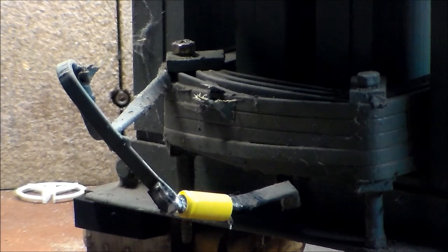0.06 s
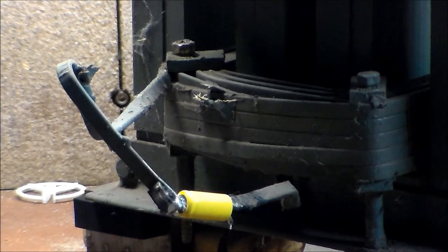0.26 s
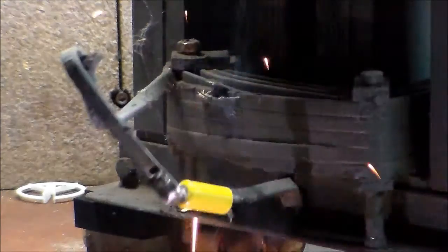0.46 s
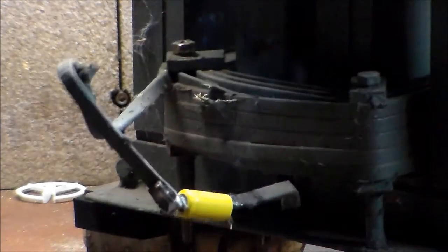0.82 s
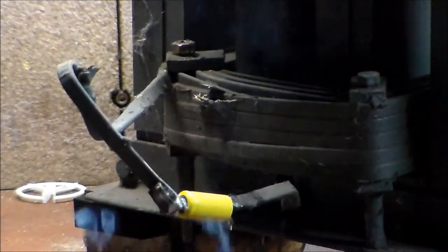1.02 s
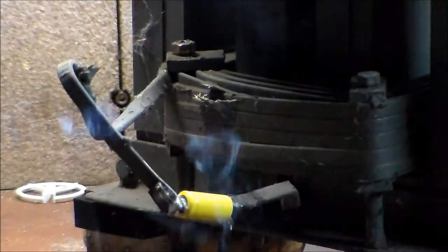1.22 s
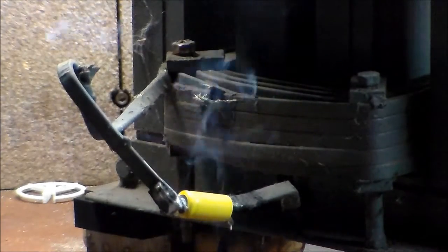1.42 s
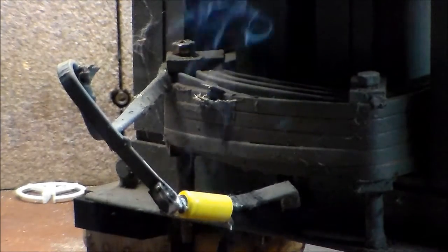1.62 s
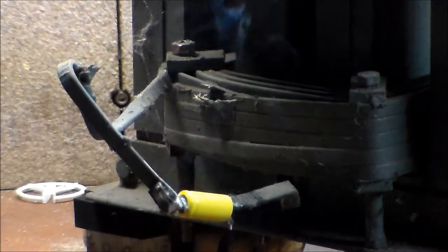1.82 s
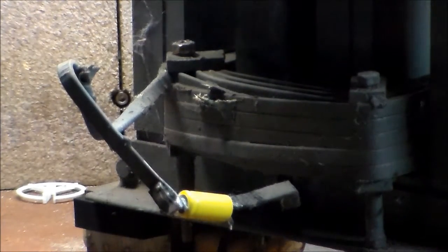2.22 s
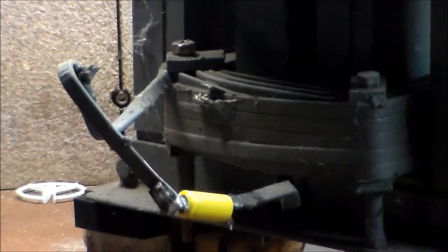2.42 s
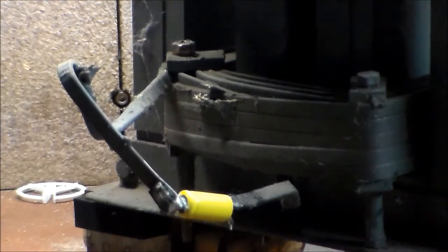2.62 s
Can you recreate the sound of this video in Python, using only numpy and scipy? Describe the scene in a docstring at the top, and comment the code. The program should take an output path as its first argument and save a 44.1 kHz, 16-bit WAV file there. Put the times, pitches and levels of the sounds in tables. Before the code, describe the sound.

A sharp electrical bang echoes briefly in a workshop, followed by a faint metallic clink. Heard from nearby, a transformer hums over machinery rumble and a faint wavering whistle, until a switch trips with a loud crack and thud.

```python
"""A workshop, heard in stereo near a big transformer. An overloaded capacitor ticks, then bursts with a
sharp bang and a spit of sparks; some way off a metal fragment clinks down. The core hums at mains pitch
and a thin whistle wavers, until a switch cracks open and its armature thuds home. Both bangs shake the
steel frame and echo round the room. Machinery rumbles behind it all; after each bang, dips drawn into
the background's level stand for the ducking of the recorder's automatic gain."""
import sys
import numpy as np
from scipy import signal
from scipy.fft import rfft, irfft, next_fast_len
from scipy.io import wavfile

SR = 44100
rng = np.random.default_rng(int(sys.argv[2]) if len(sys.argv) > 2 else 0)


def pcm_store(signal):
    """Save signal as 16-bit PCM."""
    levels = np.round(np.clip(np.atleast_2d(signal), -1, 1) * 32767)
    wavfile.write(sys.argv[1], SR, levels.astype(np.int16).T)


N = 121275
T = np.arange(N) / SR
CUTOFF_HZ = 14300


def from_db(db):
    """Decibels to gain."""
    return 10 ** (np.asarray(db) / 20)


def rms_one(x):
    """Scale to unit rms."""
    return x / np.sqrt(np.mean(x ** 2) + 1e-20)


def in_time(rows):
    """Columns of a table, joined by straight lines in time."""
    s, *columns = np.transpose(rows)
    return [np.interp(T, s, c) for c in columns]


def at_hz(points, hz):
    """Read a table on a log-frequency axis."""
    f, v = np.transpose(points)
    return np.interp(np.log(hz + 1e-9), np.log(f), v)


def pan(db):
    """Left and right gains; positive leans left."""
    return from_db([[db], [-db]])


def noise(spectrum=None):
    """Noise at a stereo pair, rms 1. Each spectrum row: frequency in Hz, relative density in dB."""
    # The two sides agree in the bass and part in the treble. Each row: Hz, left-right correlation.
    likeness = [(60, 0.96), (500, 0.96), (1200, 0.91), (2500, 0.71), (5000, 0.18), (9000, 0.11),
                (14000, 0.082)]
    size = next_fast_len(N)
    hz = np.arange(size // 2 + 1) * SR / size
    mid, side = rfft(rng.standard_normal((2, size)))
    alike = at_hz(likeness, hz)
    pair = np.sqrt(1 + alike) * mid + np.sqrt(1 - alike) * side * [[1], [-1]]
    gain = from_db(at_hz(spectrum, hz)) * (hz < CUTOFF_HZ + 1000) if spectrum else 1
    return rms_one(irfft(gain * pair, size)[:, :N])


def drift(rate_hz):
    """Slow random wander, rms 1."""
    r = np.exp(-2 * np.pi * rate_hz / SR)
    return rms_one(signal.lfilter([1], [1, -2 * r, r * r], rng.standard_normal(N + SR))[SR:])


def narrow_tone(hz, width_hz):
    """A pitch blurred into a narrow band of noise; rms 1."""
    phase = 2 * np.pi * np.cumsum(hz * np.ones(N)) / SR
    return drift(width_hz) * np.cos(phase) + drift(width_hz) * np.sin(phase)


def decay(start, t60, hold=0):
    """Instant attack, hold, then a fall of 60 dB in t60; all in seconds."""
    return (T >= start) * np.exp(-np.log(1000) * np.maximum(T - start - hold, 0) / t60)


def swell(peak_s, spread_s):
    """A smooth rise and fall."""
    return np.exp(-((T - peak_s) / spread_s) ** 2 / 2)


def workshop(build_s=0.0011):
    """Echo of the room: a diffuse tail that builds quickly and lingers longest in the bass."""
    # Reverberation time. Each row: frequency in Hz, t60 in seconds.
    room_t60 = [(150, 0.98), (500, 0.24), (1500, 0.43), (3000, 0.45), (6000, 0.33), (13000, 0.24)]
    t, white, tail = T[:SR], rfft(noise()[:, :SR]), 0
    centres = np.geomspace(100, 16000, 9)
    for hz, share in zip(centres, np.eye(len(centres))):
        band = irfft(white * at_hz(np.c_[centres, share], np.arange(SR // 2 + 1)), SR)
        tail = tail + band * np.exp(-np.log(1000) * t / at_hz(room_t60, hz))
    return rms_one(tail * (1 - np.exp(-t / build_s))) / np.sqrt(SR)


def in_room(x, room, wet_db, direct_width=0.52):
    """What reaches the microphones: direct sound, drawn towards the centre, plus its wider echo."""
    x = np.atleast_2d(x)
    centre = x.mean(axis=0)
    direct = centre + direct_width * (x - centre)
    return direct + from_db(wet_db) * signal.fftconvolve(x[:1], room, axes=1)[:, :N]


def drone(curve, waver_db):
    """A low wavering machine tone."""
    hz, db = in_time(curve)
    return np.sqrt(2) * from_db(db + waver_db * drift(6.9)) * np.sin(2 * np.pi * np.cumsum(hz) / SR)


def core_hum(hum_hz=100.04, on_s=1, off_s=2.43, fade_s=0.035, idle_db=-12.5):
    """The core's odd overtones swell under load; the whole hum drops when the switch opens."""
    # Mains hum. Each row: harmonic number, level under load in dB.
    harmonics = [(1, -53.5), (3, -59.5), (5, -64.5), (7, -64.5)]
    load = np.clip(np.minimum(T - on_s, off_s - T) / fade_s, 0, 1)
    hum = 0
    for k, db in harmonics:
        idle = T > off_s if k == 1 else 1 - load
        gain = from_db(db + idle_db * idle + 0.95 * drift(1.9))
        hum = hum + gain * np.sin(2 * np.pi * (k * hum_hz * T + rng.random()))
    return np.sqrt(2) * hum


def room_tone():
    """Machinery rumble, two drones and the core's hum, a touch to the left, in moving air and hiss."""
    # The dips after each bang stand for the recorder's automatic gain.
    # Each row: time in seconds, then rumble, air and hiss in dB.
    levels = [(0, -48.5, -51.5, -55.5), (.2, -45, -48.5, -57), (.44, -43.5, -48.5, -56.5),
              (.5, -57, -64, -76), (.7, -52.5, -55, -59), (.92, -57, -59.5, -63.5),
              (1.12, -42.5, -49.5, -66), (1.5, -45, -50, -60.5), (2.41, -44, -49, -63),
              (2.47, -54.5, -46, -58), (2.75, -52, -64.5, -66)]
    # Colours of the three noises. Each row: Hz, dB.
    rumble_spectrum = [(15, -3.5), (32, -4.5), (50, -5), (68, 3.5), (85, -2.5), (110, -4), (135, -8),
                       (200, -28), (400, -45.5)]
    air_spectrum = [(60, -11.5), (190, 0), (300, -0.5), (500, -0.5), (900, -1.5), (1600, -6.5), (2200, -13),
                    (3100, -11), (4000, -22), (8000, -33.5)]
    hiss_spectrum = [(500, 14), (3000, -1.5), (5000, 3), (7500, 0.5), (14000, -2.5)]
    # Gliding machine tones. Each row: time in seconds, pitch in Hz, level in dB.
    upper_drone = [(0, 164.1, -49), (.42, 163, -54), (.7, 151.3, -55.5), (.9, 134.6, -66.5),
                   (1.2, 162.8, -59.5), (2.0, 161.8, -58), (2.4, 158.8, -49.5), (2.5, 163.2, -60.5),
                   (2.75, 158.5, -72)]
    lower_drone = [(0, 60.25, -60), (.4, 63.6, -46.5), (.55, 63.2, -60), (.95, 63.95, -63),
                   (1.18, 73.56, -47), (1.35, 70.15, -52), (1.52, 67.2, -45), (1.85, 69.03, -43),
                   (2.25, 66.87, -48), (2.75, 62.6, -59.5)]
    rumble_db, air_db, hiss_db = in_time(levels)
    rumble = from_db(rumble_db) * noise(rumble_spectrum)
    bass = rumble + drone(upper_drone, waver_db=2.0) + drone(lower_drone, waver_db=2.5) + core_hum()
    air = from_db(air_db) * noise(air_spectrum)
    hiss = from_db(hiss_db) * noise(hiss_spectrum)
    return bass * pan(0.65) + air + hiss


def whistle(room, width_hz=49, airy_width_hz=113, airy_from_hz=3140, airy_full_hz=3550):
    """A thin whistle that turns airy as its pitch climbs, with a weaker strand just below it."""
    # The two strands. Each row: time in seconds, pitch in Hz, level in dB.
    main_strand = [(0, 3216, -60), (.28, 3104, -63), (.6, 3157, -98), (.97, 3340, -73), (1.06, 3530, -63),
                   (1.19, 3280, -66.5), (1.31, 3215, -59.5), (1.69, 3146, -74), (1.735, 3464, -59),
                   (1.81, 3520, -52.5), (1.94, 3550, -66.5), (1.98, 3365, -60), (2.11, 3327, -55.5),
                   (2.2, 3273, -67), (2.41, 3213, -62.5), (2.65, 3183, -80)]
    under_strand = [(1.0, 2790, -90), (1.08, 2820, -73), (1.4, 2900, -76), (1.56, 2914, -63.5),
                    (1.68, 2873, -73), (1.74, 3092, -59), (1.9, 3116, -61.5), (2.5, 3030, -86)]
    hz, db = in_time(main_strand)
    under_hz, under_db = in_time(under_strand)
    airy = np.clip((hz - airy_from_hz) / (airy_full_hz - airy_from_hz), 0, 1)
    main = np.sqrt(1 - airy) * narrow_tone(hz, width_hz) + np.sqrt(airy) * narrow_tone(hz, airy_width_hz)
    tones = from_db(db) * main + from_db(under_db) * narrow_tone(under_hz, width_hz)
    return in_room(tones, room, wet_db=-2)


def snaps(room):
    """Short bright snaps and clicks, including the switch's contact and latch."""
    # Each row: start in seconds, level before the low cut in dB, t60 in seconds, echo in dB, cut in Hz.
    clicks = [(0.0573, -32.5, 0.045, -1, 2760), (0.443, -33.5, 0.19, -1, 400),
              (0.5024, -21, 0.034, -11, 980), (2.4158, -36.5, 0.099, 2.5, 1490),
              (2.4235, -19.5, 0.024, -22, 6970), (2.4309, -24, 0.022, -19, 5000)]
    # Colour of the crack. Each row: Hz, dB.
    spectrum = [(200, 6.5), (1000, 3), (2200, 2), (4000, -3.5), (6000, -2.5), (8500, -4.5), (12000, -0.5),
                (15000, -5)]
    crack, out = noise(spectrum), 0
    for s, db, t60, wet_db, cut_hz in clicks:
        low_cut = signal.butter(2, cut_hz, "high", fs=SR, output="sos")
        out = out + in_room(from_db(db) * decay(s, t60) * signal.sosfilt(low_cut, crack), room, wet_db)
    return out


def rustle():
    """A dull rustle swells before the burst."""
    # Its low-midrange colour. Each row: Hz, dB.
    spectrum = [(220, -21), (420, 7), (600, 1.5), (1000, -21), (4000, -36)]
    return from_db(-51.5) * swell(peak_s=0.27, spread_s=0.13) * noise(spectrum)


def capacitor_burst(room, start_s=0.4594, sparks_per_s=2000):
    """The casing blows, and an arc spits for a moment after it."""
    # Colours of the bang and the arc. Each row: Hz, dB.
    bang_spectrum = [(100, -20), (330, 8), (700, -28), (1150, -8), (1700, 1), (4000, 3), (6500, 4),
                     (7800, 0), (14000, -0.5)]
    spark_spectrum = [(150, 1.5), (290, 7), (600, 12.5), (880, 9), (1100, -12), (1700, -10), (2800, 5.5),
                      (5000, -9), (8000, -0.5), (14000, -8)]
    bang = from_db(-18) * decay(start_s, t60=0.044) * noise(bang_spectrum)
    strikes = (rng.random(N) < sparks_per_s / SR) * rng.exponential(1, N)
    spit = rms_one(signal.fftconvolve(strikes, decay(0, t60=0.0048))[:N])
    sparks = from_db(-36.5) * decay(start_s, t60=0.3, hold=0.061) * spit * noise(spark_spectrum)
    return in_room(bang, room, wet_db=-1) + in_room(sparks, room, wet_db=-7)


def casing_and_latch(room):
    """Small stiff parts ring briefly at each bang."""
    # Each row: start in seconds, pitch in Hz, width in Hz, level in dB, t60 in seconds.
    rings = [(0.4599, 4750, 200, -22.5, 0.041), (0.4617, 1715, 76.6, -29, 0.13),
             (2.4245, 5620, 350, -21.5, 0.021), (2.4295, 4830, 150, -28.5, 0.044),
             (2.429, 1818, 35, -43.5, 0.37)]
    ringing = sum(from_db(db) * decay(s, t60) * narrow_tone(hz, width) for s, hz, width, db, t60 in rings)
    return in_room(ringing, room, wet_db=-14)


def steel_frame(room, low_cut_hz=355, scatter_db=1.0):
    """Both bangs knock the frame, ringing each mode with a strength of its own; it radiates little bass."""
    # The blows. Each row: start in seconds, level in dB.
    knocks = [(0.4600, -29), (2.4300, -16)]
    # The frame's modes. Each row: pitch in Hz, relative level in dB, t60 in seconds.
    modes = [(338.6, -9.5, 0.25), (367.5, -2, 0.073), (568, -5.5, 0.0475), (1304, -21, 0.28),
             (1705, -17, 0.15)]
    ringing = 0
    for s, db in knocks:
        for hz, mode_db, t60 in modes:
            strength = from_db(db + mode_db + scatter_db * rng.standard_normal())
            ringing = ringing - strength * decay(s, t60) * np.sin(2 * np.pi * hz * (T - s))
    low_cut = signal.butter(2, low_cut_hz, "high", fs=SR, output="sos")
    return in_room(signal.sosfilt(low_cut, ringing), room, wet_db=-15)


def fragment(room, settles_s=0.83, rattle_hz=38.5):
    """A bit of metal skitters some way off; rattling blurs its ring, which stops as it settles."""
    # The landing and bounces. Each row: start in seconds, level in dB.
    clinks = [(0.7058, -50), (0.7142, -44), (0.73, -42.5), (0.746, -46), (0.799, -51), (0.858, -54)]
    # The fragment's modes. Each row: pitch in Hz, relative level in dB, t60 in seconds.
    modes = [(2385, 3, 0.11), (2498, -3, 0.12), (3025, -7, 0.37), (4230, 0, 0.16), (4910, -2, 0.24),
             (6810, -6, 0.12)]
    # Colour of each contact. Each row: Hz, dB.
    spectrum = [(800, -14), (1900, -4), (2500, 5), (4500, -3), (5800, -8.5), (7000, -0.5), (8500, -13),
                (14000, -16)]
    contact = sum(from_db(db) * decay(s, t60=0.073) for s, db in clinks) * noise(spectrum)
    ring = 0
    for hz, mode_db, t60 in modes:
        energy = sum((from_db(db + mode_db) * decay(s, t60)) ** 2 for s, db in clinks)
        blurred_hz = hz + rattle_hz * drift(2 * rattle_hz)
        ring = ring + np.sqrt(energy) * np.cos(2 * np.pi * np.cumsum(blurred_hz) / SR)
    ring = from_db(-6) * decay(0, t60=0.04, hold=settles_s) * ring
    return in_room(contact, room, wet_db=-0.5) + in_room(ring, room, wet_db=-13)


def fizz(flicker_db=2):
    """A soft flickering hiss swells as the load comes back."""
    # Its midrange colour. Each row: Hz, dB.
    spectrum = [(500, -3), (1300, -4.5), (2800, 2), (3700, -2), (5000, -11), (13000, -23)]
    return from_db(-57 + flicker_db * drift(28.1)) * swell(peak_s=1.04, spread_s=0.13) * noise(spectrum)


def switch(room):
    """The armature slams home with a dull thud."""
    # Colour of the slam. Each row: Hz, dB.
    spectrum = [(220, -26), (310, -11), (380, 4.5), (580, -2), (900, -2), (1800, -5.5), (2400, -7.5),
                (4500, -7), (6000, -10.5), (14000, -18.5)]
    slam = from_db(-22.5) * decay(start=2.4302, t60=0.073) * noise(spectrum)
    return in_room(slam, room, wet_db=-4.5)


def scene():
    """All sources in one room, the hits just right of centre."""
    room = workshop()
    hits = snaps(room) + capacitor_burst(room) + casing_and_latch(room)
    hits = hits + switch(room) + steel_frame(room) + fragment(room)
    return hits * pan(-0.36) + whistle(room) + fizz() + rustle() + room_tone()


def record(dry):
    """A steep low-pass cuts the top treble."""
    return signal.sosfilt(signal.ellip(10, .2, 80, CUTOFF_HZ, fs=SR, output="sos"), dry)


dry = scene()
out = record(dry)
pcm_store(out)
```